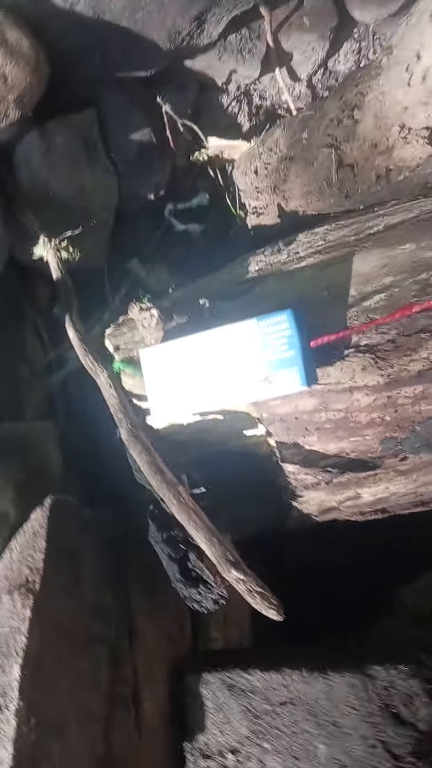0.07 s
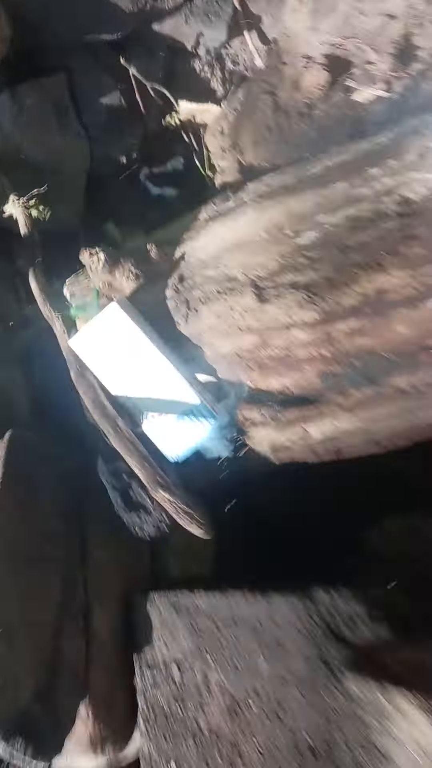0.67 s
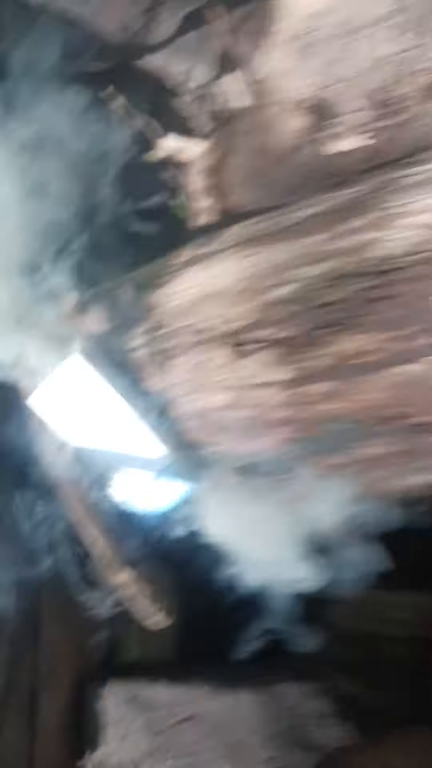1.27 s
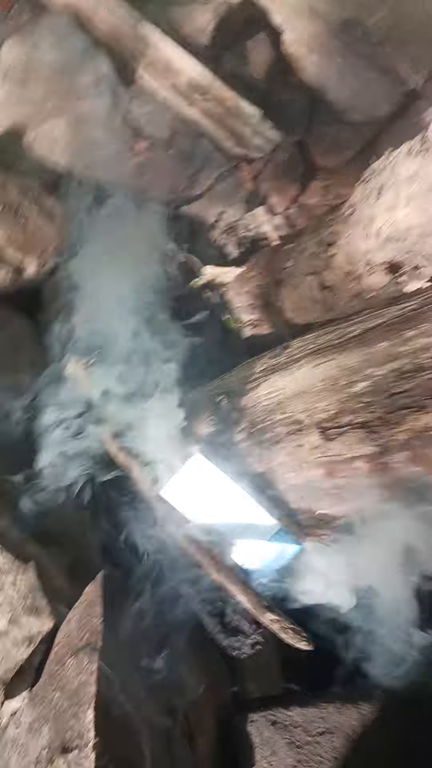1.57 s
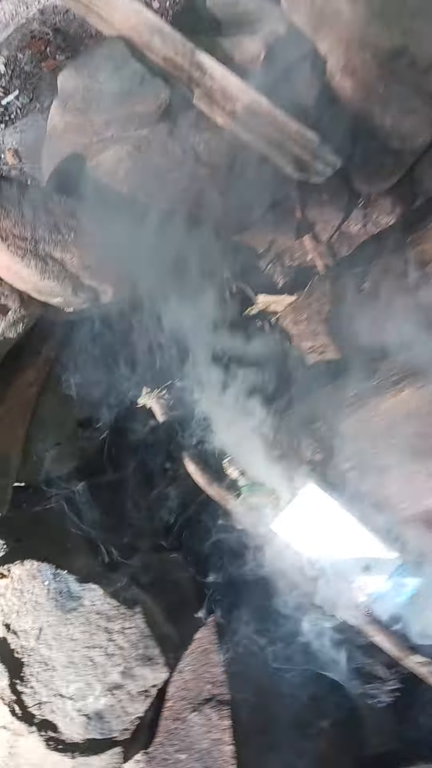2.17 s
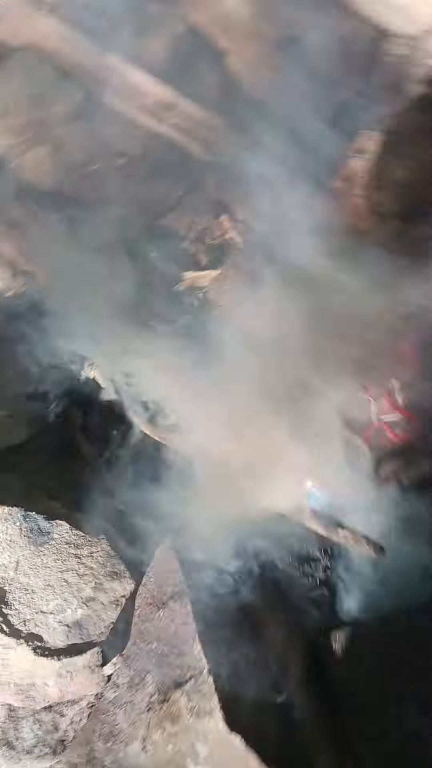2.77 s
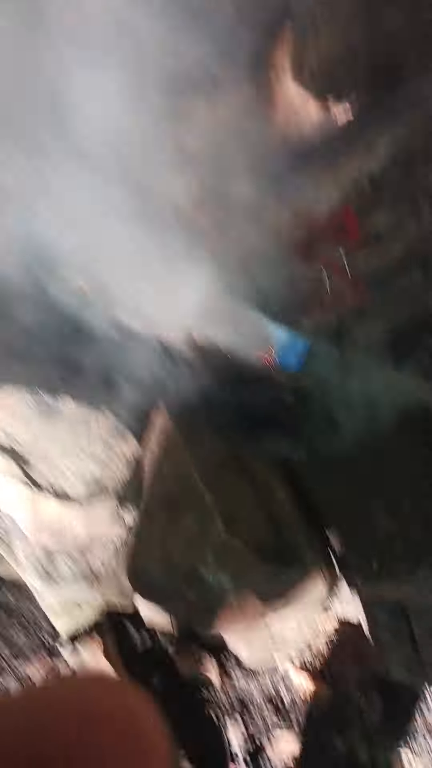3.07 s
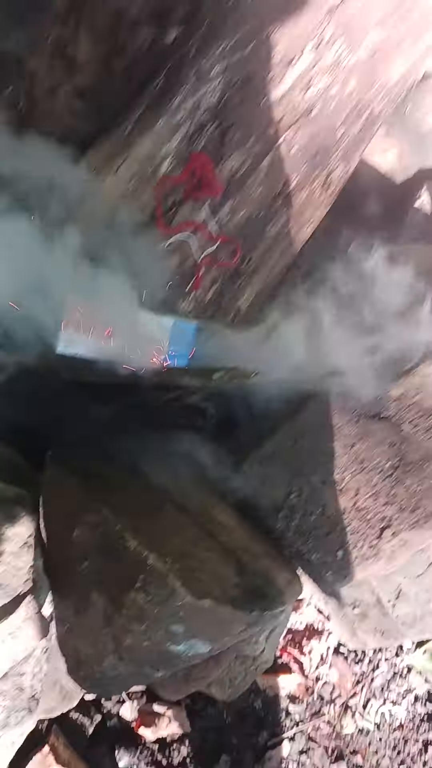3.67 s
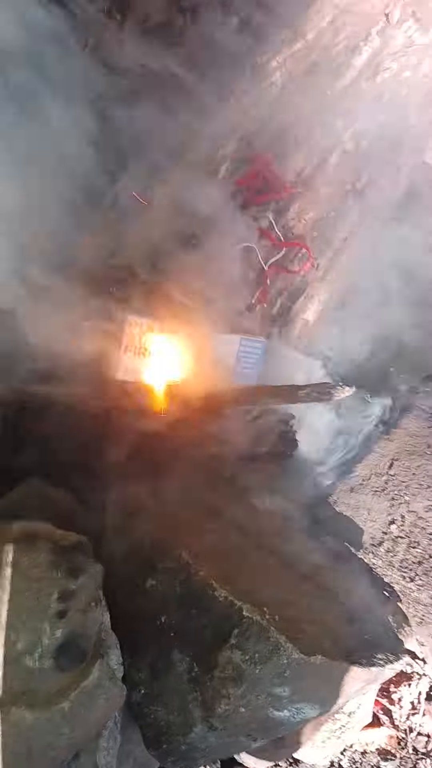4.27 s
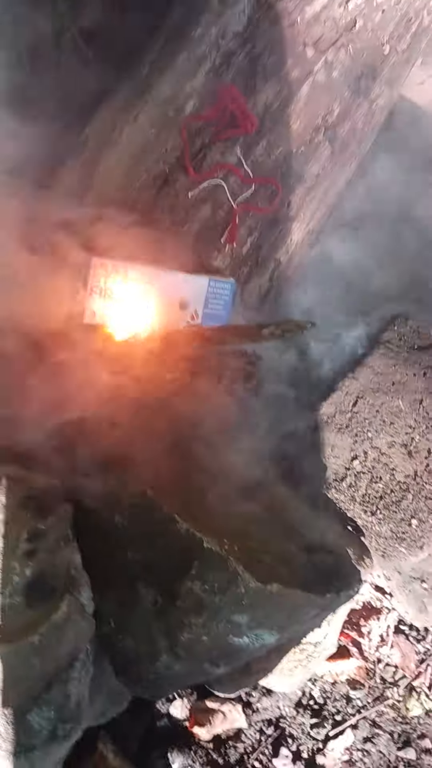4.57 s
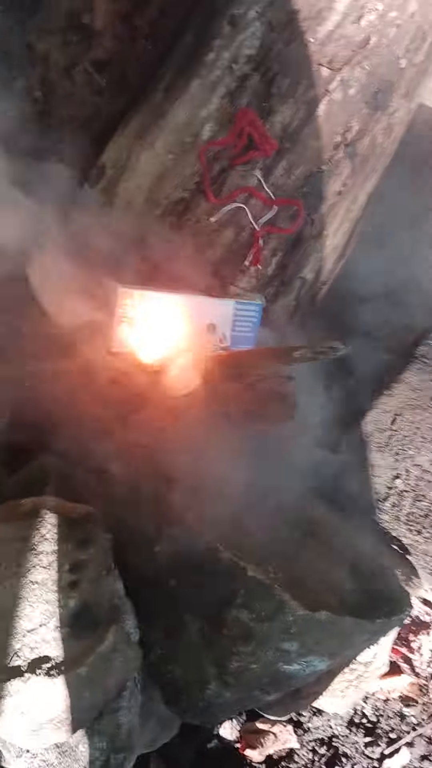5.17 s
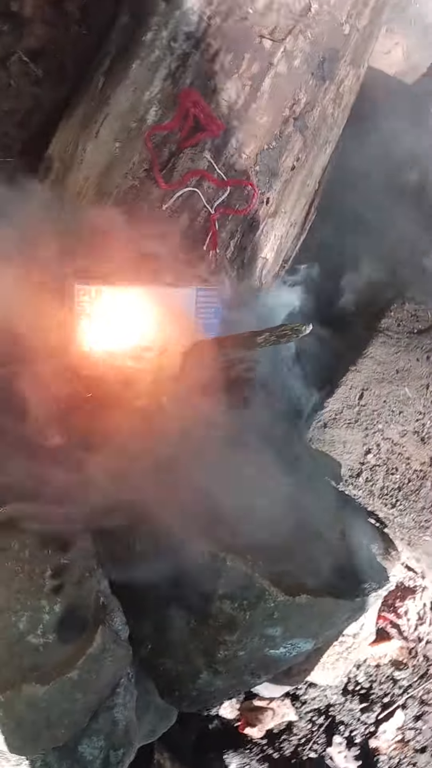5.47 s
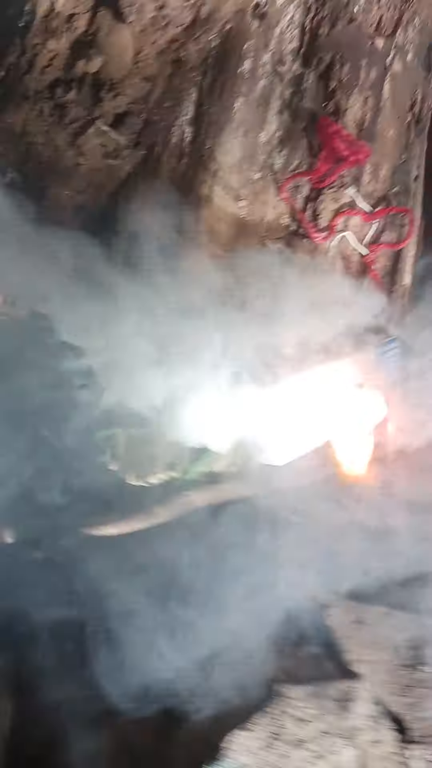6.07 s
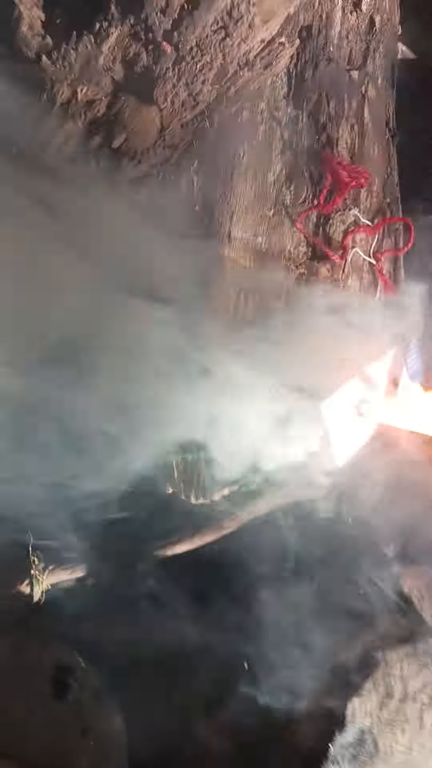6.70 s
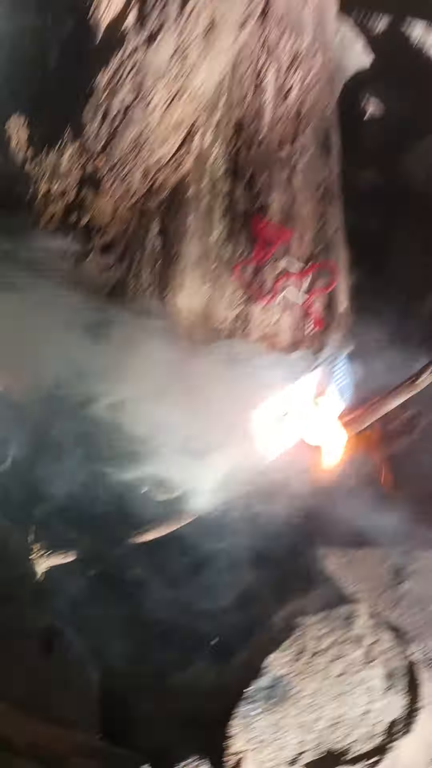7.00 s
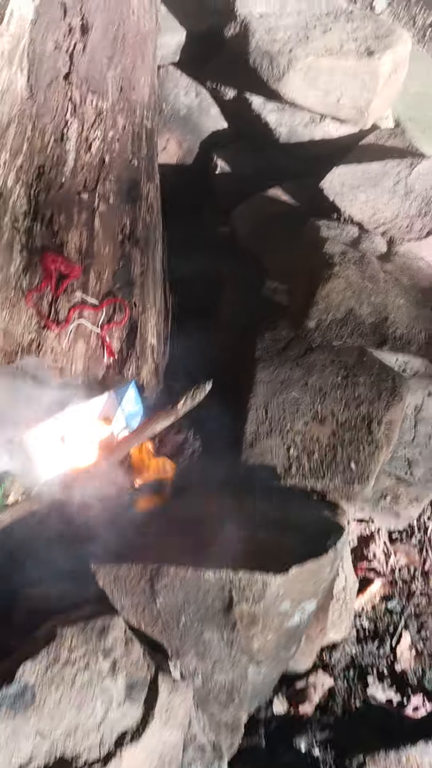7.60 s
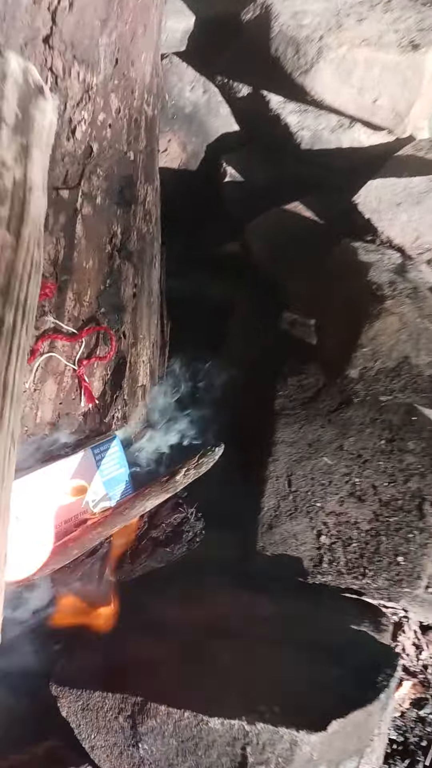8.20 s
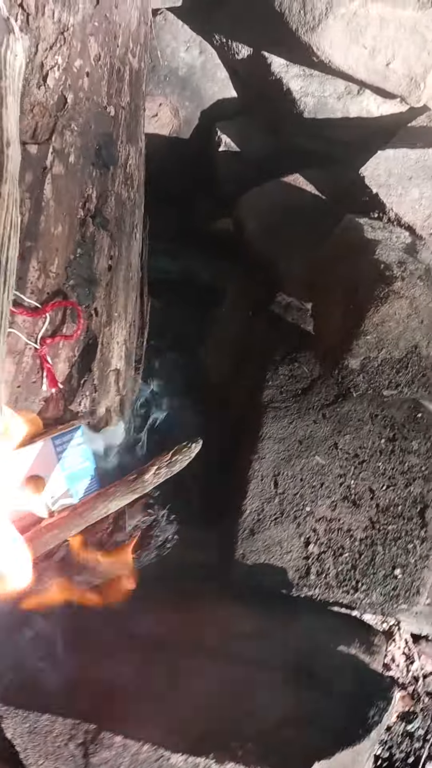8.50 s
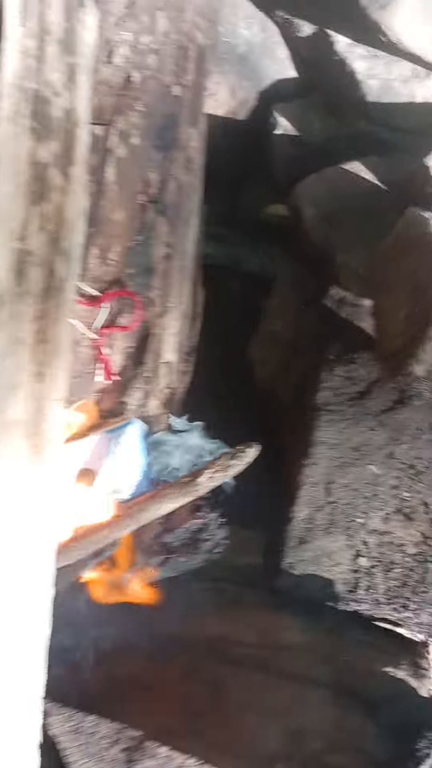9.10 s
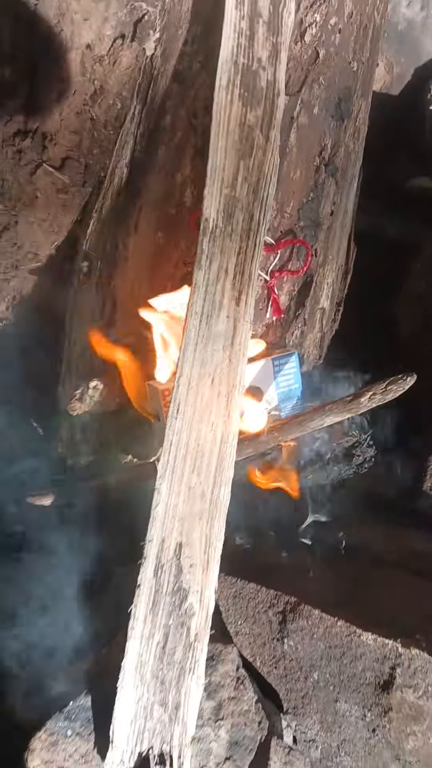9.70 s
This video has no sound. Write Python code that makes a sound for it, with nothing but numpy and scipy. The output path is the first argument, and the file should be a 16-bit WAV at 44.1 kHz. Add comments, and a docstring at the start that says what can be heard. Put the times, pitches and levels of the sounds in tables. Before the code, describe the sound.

Over the steady rush of the woods, an igniter cracks and puffs close by in a stone fire ring. A hiss of escaping smoke fades, then builds, interrupted by a thump of a finger on the microphone's right side. The hiss settles into a low rush of flame with a brief spit. Sticks tap, feet scuff through dry leaves, and the burning box crackles lightly at the end.

```python
"""Pull-string firestarter in the woods

Among logs in a stone fire ring an igniter snaps, thuds and puffs. Smoke jets from the box with a growing
hiss, coloured by the hollows around it; then the charge flares, burns more softly and crackles as pockets
burst. Sticks tap, a hand bumps the microphone and brushes its right port, feet shuffle in leaf litter,
and the woods rush steadily behind. Loud bangs duck the gain for a second or so."""
import sys
import numpy as np
from scipy import signal
from scipy.fft import rfft, irfft, next_fast_len
from scipy.io import wavfile
from scipy.ndimage import uniform_filter1d, map_coordinates

SR = 44100
rng = np.random.default_rng(int(sys.argv[2]) if len(sys.argv) > 2 else 0)


def pcm_store(signal):
    """Save signal as 16-bit PCM."""
    levels = np.round(np.clip(np.atleast_2d(signal), -1, 1) * 32767)
    wavfile.write(sys.argv[1], SR, levels.astype(np.int16).T)


N = 434385

# The bare tone of the hiss. Each row: frequency in Hz, relative level in dB.
HISS_SPECTRUM = [(100, -22), (300, -6.5), (600, -1.5), (1000, -2.5), (1400, 3), (3000, 1.5), (6000, -3.5),
                 (9000, -4), (15500, -21.5)]
# Hollows of box, log and stones, one set for each stage of the burn.
# Each row: centre in Hz, width in Hz, lift in dB, lean to the left in dB.
PUFF_HOLLOWS = [(920, 160, -2, -11.5), (1780, 310, 6, -8), (2770, 440, 5.5, 2), (13300, 11000, 6, 12)]
SMOULDER_HOLLOWS = [(945, 170, -8, -12), (1210, 420, 4.5, 0), (2110, 450, -4.5, 13), (2670, 740, 4, -1.5),
                    (4260, 1000, 8.5, -2)]
BUILD_HOLLOWS = [(120, 230, 8, -5), (840, 170, 2, -11), (1300, 310, 4.5, -5.5), (1820, 190, 3, 9),
                 (2050, 150, -1, -5), (2540, 390, 3.5, 9.5), (2880, 330, 4.5, -4)]
VENT_HOLLOWS = [(1920, 530, 5.5, -1.5), (2150, 160, -5, -2), (2730, 650, 7.5, -3.5), (3400, 330, -2, 5),
                (4000, 180, 0, -9), (13740, 5200, 14, -13)]
FLARE_HOLLOWS = [(1740, 330, -3, 5), (2190, 170, -4, -2), (2570, 300, 4, 3), (3320, 270, -7, -5),
                 (14130, 7500, 6, -34)]
FLAME_HOLLOWS = [(450, 220, 9.8, -1), (1183, 55, 13.3, -9.5), (1520, 91, 12, 4), (2425, 410, 12.4, -2),
                 (4520, 410, 2.6, -10.5), (14100, 7200, 6, -30)]
# When each stage after the puff takes over, in seconds.
STAGE_STARTS = [1.05, 1.8, 3.15, 4.38, 8.25]
LIT_S = .53

def jet(level_db=2, patchy_db=2.17, sputter_db=0.46, flutter_db=0.82):
    """Gas rushes out of the box; the hollows it excites change as the box burns open."""
    hz, t, noise = signal.stft(air_noise(N), SR, nperseg=512)
    flow_db, bright_db = gas_flow(t)
    colour_db = along(HISS_SPECTRUM, hz)[:, None] + whistle(hz, t, bright_db)
    stages = [PUFF_HOLLOWS, SMOULDER_HOLLOWS, BUILD_HOLLOWS, VENT_HOLLOWS, FLARE_HOLLOWS, FLAME_HOLLOWS]
    crossfades = np.ravel([(s - .1, s + 0.087) for s in STAGE_STARTS])
    stage = np.interp(t, crossfades, np.ravel([(k, k + 1) for k in range(len(STAGE_STARTS))]))
    for k, rows in enumerate(stages):
        colour_db = colour_db + hollows(rows, hz) * np.maximum(1 - abs(stage - k), 0)
    # the flow sets the power of the body of the hiss and of the fizz above it
    power = (amp(colour_db) ** 2).mean(0) / len(hz)
    band_db = lambda lo, hi: 10 * np.log10(power[(hz > lo) & (hz < hi)].sum(0))
    body_db, fizz_db = band_db(1100, 3300), band_db(4000, 6200)
    treble = along([(2700, 0), (4400, 0.88)], hz)[:, None]
    drive_db = flow_db + level_db - (1 - treble) * body_db + treble * (bright_db - fizz_db)
    # eddies shade the spectrum in drifting patches, and the uneven burn makes it sputter
    patches = uniform_filter1d(rng.standard_normal(noise.shape[1:]), size=3, axis=0)
    eddies = unit(uniform_filter1d(patches, size=22, axis=1))
    _, hiss = signal.istft(noise * amp(colour_db + drive_db + patchy_db * eddies), SR, nperseg=512)
    lit = np.interp(np.arange(N) / SR, [LIT_S, .64], [0, 1])
    return hiss[:, :N] * lit * amp(sputter_db * wobble(260) + flutter_db * wobble(25))


# The two jets of smoke, before and after the vent opens.
# Each row: time in seconds, relative level in dB, brightness in dB, whistle pitch in Hz.
FIRST_JET = [(1.85, -48, -11, 5630), (1.934, -45, -11, 5260), (2.05, -46, -8.5, 5620),
             (2.52, -40.5, -5, 5200), (2.94, -40, 4.5, 5170)]
SECOND_JET = [(3.06, -51, 0, 5400), (3.12, -49.5, 6, 6150), (3.248, -46.5, 0.5, 5360),
              (3.534, -43.5, 2.5, 4860), (3.914, -43.5, 0.5, 5740), (4.092, -44.5, -7, 5010),
              (4.316, -42.5, -8.5, 5230), (4.36, -52, -8, 5160)]
# The charge flares, then the box catches.
# Each row: start in seconds, rise in seconds, relative level in dB, fade in dB a second, brightness in dB.
BLAZES = [(4.22, 0.22, -48.5, 0.94, -4.5), (8.05, 0.1, -47.5, 1, -2)]

def gas_flow(t, primer_db=-39.5, fade_db_per_s=6, dull_db_per_s=3, cut_db_per_s=145):
    """Level and brightness in dB of the escaping gas: a fading, dulling primer, two jets, two blazes."""
    age = np.maximum(t - LIT_S, 0)
    parts = [(amp(primer_db - fade_db_per_s * age), -4 - dull_db_per_s * age)]
    for rows, gain_db in [(FIRST_JET, 0.7), (SECOND_JET, 5.5)]:
        level_db, bright_db, _ = curves(rows, t)
        outside_s = abs(t - np.clip(t, rows[0][0], rows[-1][0]))
        parts.append((amp(level_db + gain_db - cut_db_per_s * outside_s), bright_db))
    for start, rise, level_db, fade, bright_db in BLAZES:
        age = np.maximum(t - start, 0)
        swell = (1 - np.exp(-age / rise)) ** 2
        parts.append((amp(level_db - fade * age) * swell, bright_db))
    body = sum(gain ** 2 for gain, _ in parts)
    fizz = sum((gain * amp(bright_db)) ** 2 for gain, bright_db in parts)
    return 10 * np.log10(body), 10 * np.log10(fizz / body)


def whistle(hz, t, bright_db, width_hz=1000, waver_hz=130):
    """The vent's breathy whistle: a wavering lift in dB that stands out more as the jet gets brighter."""
    waver = waver_hz * np.interp(t * SR, np.arange(N), wobble(22))
    pitch_hz = curves([*FIRST_JET, *SECOND_JET], t)[-1] + waver
    lift_db = np.clip(6 + 0.8 * bright_db, 0, 11)
    return hollows([(pitch_hz, width_hz, lift_db, -0.55 * lift_db)], hz)


def hollows(rows, hz):
    """The lift in dB that a set of resonances gives on the left and on the right."""
    sides = np.array([1, -1])[:, None, None]
    return sum((db + sides * lean_db / 2) / (1 + (2 * (hz[:, None] - centre_hz) / width_hz) ** 2)
               for centre_hz, width_hz, db, lean_db in rows)


# Snaps and spits. Each row: crest time in seconds, level in dB, rise in seconds, 60 dB decay in seconds,
# centre in Hz, width in octaves, lean to the left in dB.
IGNITER_SNAPS = [(.482, -32, 0.0053, .12, 1550, 0.19, 1), (.4962, -16, .001, .03, 5240, 2.8, 9),
                 (.499, -23, 0.0046, 0.045, 1490, 0.22, -1), (.5015, -15, 0.0018, 0.035, 3540, 0.21, 4),
                 (.502, -9, 0.0017, .013, 6100, 0.74, 6), (.5262, -6.5, 0.001, 0.05, 4300, 3, 2.5),
                 (.547, -18, 0.011, .47, 5500, 1.7, 1.5)]
FLARE_SPITS = [(6.119, -27.5, .003, 0.029, 900, 1.9, -6), (6.141, -36, 0.091, 1.77, 10900, 3.8, -7),
               (6.714, -31, 0.00087, .02, 4500, 0.23, -5)]

def snaps_and_spits():
    """The igniter snaps and puffs; later the flare cracks and spits as it breaks through the box."""
    return strokes(IGNITER_SNAPS + FLARE_SPITS, grain_db=2.5, grains_per_s=3200)


# The sharpest crackles. Each row: start in seconds, relative level in dB.
SHARP_CRACKLES = [(6.7136, -31), (8.4016, -23.5), (8.75, -21.5), (8.8489, -25), (8.977, -23.5),
                  (9.0782, -22), (9.1652, -21.5), (9.2102, -24), (9.261, -24), (9.434, -27), (9.524, -25),
                  (9.7253, -28), (9.7931, -26)]
# The ring of the box. Each row: pitch in Hz, relative level in dB, 60 dB decay in seconds.
BOX_MODES = [(450, -23, 0.0064), (1240, -10, 0.0092), (1540, -8.5, 0.01), (2430, -2, 0.0092),
             (3170, 1, 0.0017), (4470, -3.5, 0.0066)]

def crackles(level_db=3.0, spread_db=3, charge_per_s=26, box_per_s=90):
    """Pockets burst at random in the flaring charge, denser and louder once the box itself is alight."""
    out, bursts = np.zeros((2, N)), list(SHARP_CRACKLES)
    flare_s, alight_s = BLAZES[0][0], BLAZES[1][0] + 2 * BLAZES[1][1]
    spells = [(flare_s, alight_s, charge_per_s, -43), (alight_s, N / SR, box_per_s, -39)]
    for start, stop, rate, faint_db in spells:
        waits, sizes = rng.exponential(size=(300, 2)).T
        times = start + np.cumsum(waits) / rate
        bursts += [(s, faint_db + spread_db * min(size, 3.3)) for s, size in zip(times, sizes) if s < stop]
    for start, db in bursts:
        pop = tick(BOX_MODES, crack=0.72, scatter=0.3, scatter_t60=0.037)
        add(out, start + 0.001058, amp(db + level_db) * pop)
    return out * pan(lean_db=-4)


# The low rush of the flames. Each row: frequency in Hz, relative level in dB.
ROAR_SPECTRUM = [(30, -17), (60, -2), (130, -2.5), (380, 3.5), (700, -1), (1500, -6), (6000, -31)]

def roar(level_db=-52, grow_s=0.74, flicker_db=0.8):
    """The flames draw air: a low, flickering rush that grows from the first blaze on."""
    age = np.maximum(np.arange(N) / SR - BLAZES[0][0], 0)
    rush = unit(filtered(air_noise(N), lambda hz: amp(along(ROAR_SPECTRUM, hz))))
    return rush * (1 - np.exp(-age / grow_s)) * amp(level_db + flicker_db * wobble(9.9))


# Wood on wood. Each row: start in seconds, level in dB.
STICK_TAPS = [(2.61, -20.5), (4.283, -24), (8.5737, -19), (8.5824, -22.5)]
# The ring of a stick. Each row: pitch in Hz, relative level in dB, 60 dB decay in seconds.
STICK_MODES = [(734, -36, 0.035), (1026, -3.5, 0.011), (1293, -3, 0.015), (2480, 3.5, 0.0037)]

def stick_taps():
    """Sticks tap against the logs and ring briefly."""
    out = np.zeros((2, N))
    for start, db in STICK_TAPS:
        add(out, start, amp(db) * tick(STICK_MODES, crack=0.18, scatter=1.0, scatter_t60=0.012))
    return out * pan(lean_db=-8)


# Close, dry scrapes. Each row: crest time in seconds, level in dB, rise in seconds,
# 60 dB decay in seconds, centre in Hz, width in octaves, lean to the left in dB.
FINGER_SCRAPES = [(2.994, -23.5, 0.031, 0.059, 850, 1.63, -15),
                  (2.9985, -5.5, 0.0039, 0.048, 11500, 0.84, -28), (3.0108, -6, .0035, .017, 610, 1.4, -39)]

def finger_brush():
    """A finger rubs across the right microphone port."""
    return strokes(FINGER_SCRAPES, grain_db=4, grains_per_s=3600)


# Low thumps at the microphone: the igniter's thud, then handling bumps.
# Each row: start in seconds, level in dB, lean to the left in dB.
LOW_THUMPS = [(0.529, -23, 2), (1.02, -45, -6), (1.332, -43, -15), (2.811, -36, -17), (2.86, -41, -8),
              (3.183, -31, -27), (3.629, -40, 15), (8.32, -41, 0)]
# The finger seals the right port and lets go.
# Each row: start in seconds, level in dB, pitch in Hz, 60 dB decay in seconds, lean to the left in dB.
PORT_THUMPS = [(3.009, -4, 132, 0.029, -38), (3.022, -13, 60, 0.092, -40)]

def thumps(thump_hz=64, thump_t60=0.15, rough=0.45, attack_s=0.0011):
    """Igniter, hand and finger thump the microphone: a few slow, uneven cycles of pressure at each port."""
    out, t = np.zeros((2, N)), np.arange(SR // 4) / SR
    thuds = [(start, db, thump_hz, thump_t60, lean_db) for start, db, lean_db in LOW_THUMPS]
    for start, db, hz, t60, lean_db in thuds + PORT_THUMPS:
        rumble = unit(filtered(rng.standard_normal((2, len(t))), lambda f: 1 / (1 + (f / hz) ** 4)))
        swing = rough * rumble - np.sin(2 * np.pi * hz * t)
        envelope = decay(t, t60) * (1 - np.exp(-t / attack_s))
        add(out, start, amp(db) * pan(lean_db) * swing * envelope)
    return out


# Soft scuffs.
# Each row: crest time in seconds, level in dB, 60 dB decay in seconds, centre in Hz, width in octaves.
FOOT_SCUFFS = [(4.29, -43, 0.69, 200, 2.4), (5.83, -45, 0.33, 450, 0.83), (6.145, -38, 0.29, 387, 1.9),
               (6.26, -42, .9, 640, .33), (6.644, -34.5, 0.23, 264, 0.34), (6.705, -38, 0.45, 105, 1.63),
               (7.39, -33.5, 0.78, 7000, 2.9), (7.41, -44.5, 0.53, 610, 0.27),
               (7.47, -35.5, .12, 2500, 0.63)]

def footsteps(rise_s=.03, lean_db=-3.5):
    """Feet shuffle in leaf litter on the right, each scuff swelling at the same pace."""
    rows = [(s, db, rise_s, t60, hz, octaves, lean_db) for s, db, t60, hz, octaves in FOOT_SCUFFS]
    return strokes(rows, grain_db=2, grains_per_s=400)


# The broad bed of the woods. Each row: frequency in Hz, relative level in dB.
WOODS_SPECTRUM = [(25, -17), (60, -2), (130, -1), (200, -2), (380, 2), (600, 1), (900, 0), (1500, 2.5),
                  (3000, 1.5), (7000, -1.5), (15500, -5.5)]

def woods(level_db=-44.0, treble_lean_db=3.0, drift_db=0.57):
    """The steady rush of the surroundings; its treble comes more from the left."""
    lean = lambda hz: along([(2000, 0), (8000, treble_lean_db)], hz) * np.array([[.5], [-.5]])
    rush = unit(filtered(air_noise(N), lambda hz: amp(along(WOODS_SPECTRUM, hz) + lean(hz))))
    return rush * amp(level_db + drift_db * wobble(2.2))


def strokes(rows, grain_db, grains_per_s):
    """Snaps, puffs and scuffs: grainy noise that swells and dies away."""
    out = np.zeros((2, N))
    for crest_s, db, rise, t60, centre_hz, octaves, lean_db in rows:
        t = np.arange(-3 * rise, t60 + .01, 1 / SR)
        knots = np.arange(t[0], t[-1], 1 / grains_per_s)
        grains = amp(grain_db * np.interp(t, knots, rng.standard_normal(len(knots))))
        band = lambda hz: np.exp(-.5 * (np.log2((hz + 1) / centre_hz) / octaves) ** 2)
        rasp = unit(filtered(air_noise(len(t)) * grains, band))
        envelope = np.where(t < 0, np.exp(-(t / rise) ** 2), decay(abs(t), t60))
        add(out, crest_s + t[0], amp(db) * pan(lean_db) * envelope * rasp)
    return out


def tick(modes, crack, scatter, scatter_t60):
    """One contact: a brief push, ringing modes and scatter from the stones."""
    t = np.arange(SR // 30) / SR
    hz, db, t60 = np.transpose(modes)[..., None]
    detune, strength, phase = rng.standard_normal((3, len(modes), 1))
    swing = np.sin(2 * np.pi * hz * (1 + 0.062 * detune) * t + np.pi * phase)
    ring = (amp(db + 2 * strength) * swing * decay(t, t60)).sum(0)
    push = np.exp(-((t - .0002) / .00008) ** 2)
    direct = ring * (1 - np.exp(-t / .0001)) - crack * push
    stones = rng.standard_normal((2, len(t))) * decay(t, scatter_t60)
    echoes = signal.fftconvolve(stones / np.linalg.norm(stones[0]), direct[None], axes=1)[:, :len(t)]
    both = direct + scatter * echoes
    return both / np.abs(both.mean(0)).max()


# Stereo width of the air. Each row: frequency in Hz, left-right likeness from 0 to 1.
STEREO_LIKENESS = [(60, 0.76), (300, 0.94), (700, 0.51), (1500, 0.21), (4000, 0.033), (9000, 0.084)]

def air_noise(size, lead_s=.0001):
    """White noise at two ports: alike in the bass, less so in the treble, a little earlier on the left."""
    turn = lambda hz: np.arccos(np.clip(along(STEREO_LIKENESS, hz), -1, 1)) / 2
    shares = lambda hz: np.array([np.cos(turn(hz)), np.sin(turn(hz))])
    mid, side = filtered(rng.standard_normal((2, size)), shares)
    left_first = lambda hz: np.exp(1j * np.pi * hz * lead_s * np.array([[1], [-1]]))
    return filtered(np.array([mid + side, mid - side]), left_first)


def amp(db):
    """Decibels as a gain."""
    return 10 ** (np.asarray(db) / 20)


def decay(t, t60):
    """A fall of 60 dB every t60 seconds."""
    return amp(-60 * t / t60)


def unit(x):
    """x scaled to rms 1."""
    return x / np.sqrt(np.mean(x ** 2) + 1e-20)


def along(points, hz):
    """A curve through (Hz, value) points on a log axis."""
    point_hz, values = np.transpose(points)
    return np.interp(np.log(hz + 1), np.log(point_hz + 1), values)


def curves(rows, t):
    """Each column after the time, read at times t."""
    times, *columns = np.transpose(rows)
    return [np.interp(t, times, column) for column in columns]


def wobble(rate):
    """A smooth random curve, rate knots a second."""
    knots = rng.standard_normal(int(N * rate / SR) + 4)
    return map_coordinates(knots, [np.arange(N) * rate / SR], order=2)


def filtered(x, response):
    """x shaped by a frequency response."""
    size = x.shape[-1]
    padded = next_fast_len(size + 8192)
    return irfft(rfft(x, padded) * response(np.fft.rfftfreq(padded, 1 / SR)), padded)[..., :size]


def pan(lean_db):
    """Left and right gains of constant power; positive leans left."""
    return unit(amp([[lean_db / 2], [-lean_db / 2]]))


def add(track, start_s, sound):
    """Mix a stereo sound into the track."""
    start = int(np.clip(round(start_s * SR), 0, N - 1))
    track[:, start:start + sound.shape[1]] += sound[:, :N - start]


def scene():
    """Fire, hand and feet over the rush of the woods."""
    fire = snaps_and_spits() + jet() + roar() + crackles() + stick_taps()
    return fire + finger_brush() + thumps() + footsteps() + woods()


def gain_control(x, threshold_db=-24, depth_db=6, attack_s=0.074, hold_s=1.11, release_s=0.66):
    """A loud bang turns the gain down; it stays there a while, then creeps back."""
    hop = 256
    def past(values, seconds):
        size = int(seconds * SR / hop) + 1
        return np.lib.stride_tricks.sliding_window_view(np.pad(values, (size - 1, 0)), size)
    power = abs(uniform_filter1d((x ** 2).mean(0), 2 * hop))[::hop]
    over_db = np.clip(10 * np.log10(power + 1e-12) - threshold_db, 0, depth_db)
    held_db = past(over_db, hold_s).max(1)
    cut_db = np.maximum(past(held_db, attack_s).mean(1), past(held_db, release_s).mean(1))
    return x * amp(-np.interp(np.arange(N), np.arange(0, N, hop), cut_db))


# Each microphone port has its own treble notch. Each row: frequency in Hz, gain in dB.
LEFT_PORT_EQ = [(5000, 0), (7400, 0), (8200, -9.5), (8900, -16.5), (10500, -10), (12700, -1), (15700, -4)]
RIGHT_PORT_EQ = [(4000, 0), (5900, 1), (6600, -5), (7500, -24), (8600, -17), (10500, -10.5), (12700, -4),
                 (15700, -2.5)]

def record(dry, ceiling=0.75, top_hz=15900):
    """The two ports colour the treble, bangs duck the gain, peaks saturate and the very top is cut."""
    coloured = filtered(dry, lambda hz: amp([along(LEFT_PORT_EQ, hz), along(RIGHT_PORT_EQ, hz)]))
    ducked = gain_control(coloured)
    saturated = ducked / (1 + (ducked / ceiling) ** 4) ** .25
    return filtered(saturated, lambda hz: hz < top_hz)


dry = scene()
out = record(dry)
pcm_store(out)
```